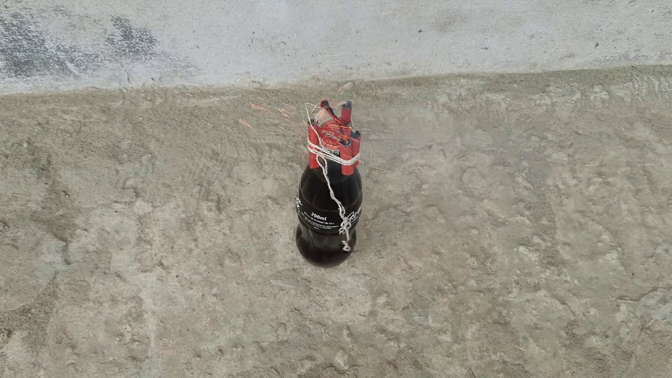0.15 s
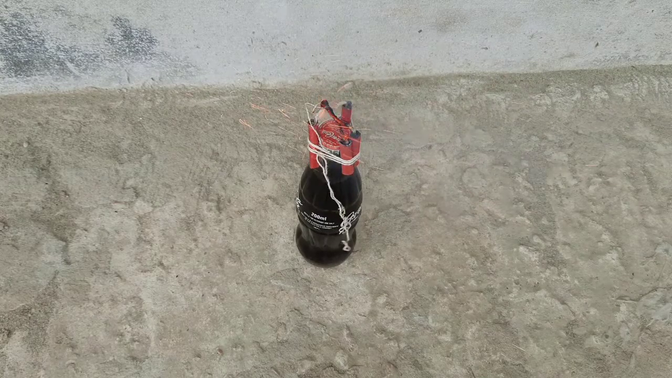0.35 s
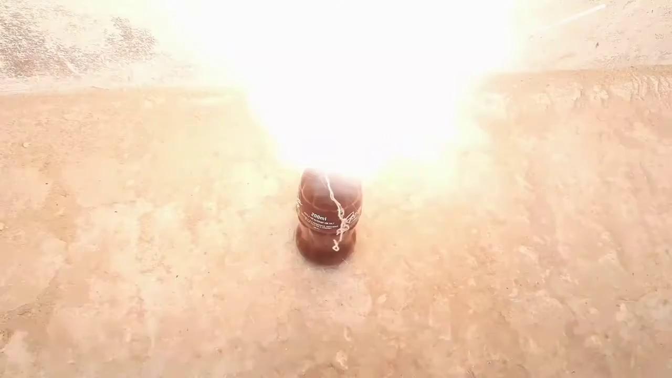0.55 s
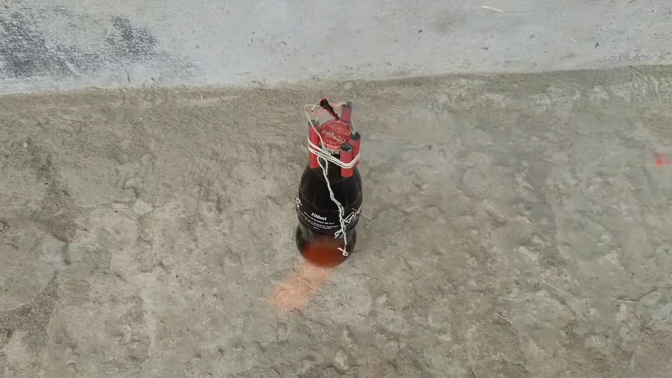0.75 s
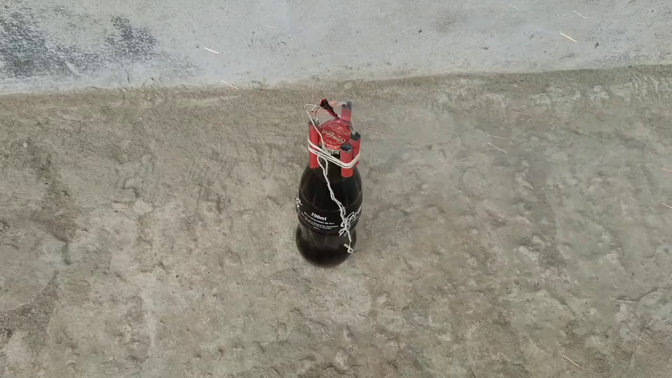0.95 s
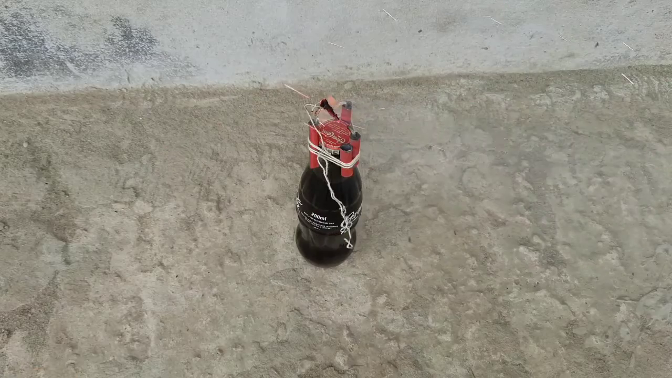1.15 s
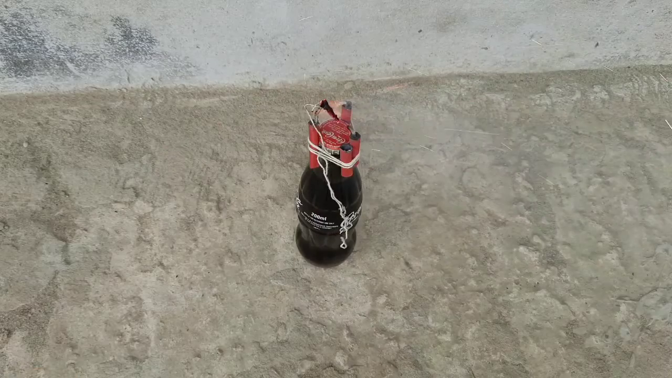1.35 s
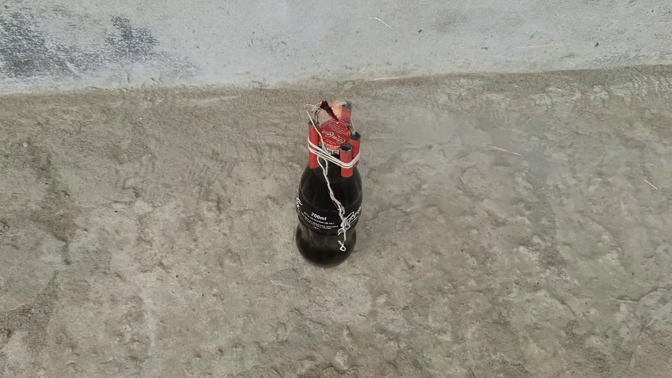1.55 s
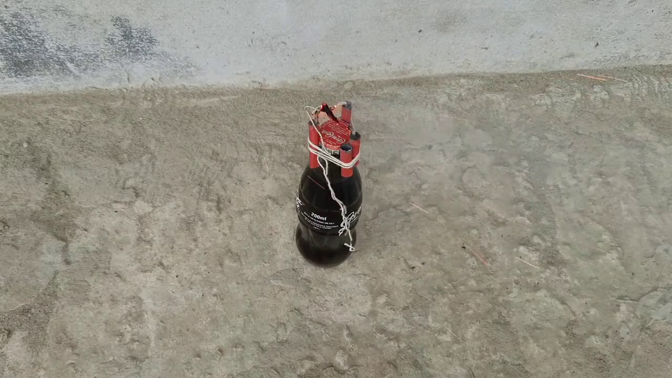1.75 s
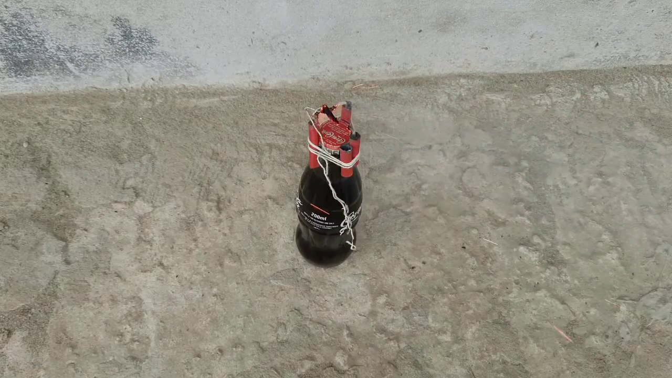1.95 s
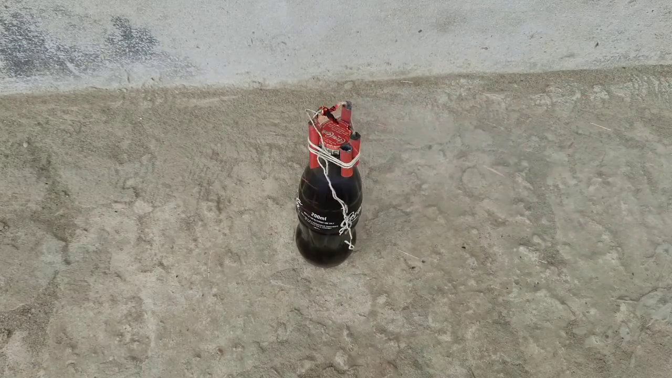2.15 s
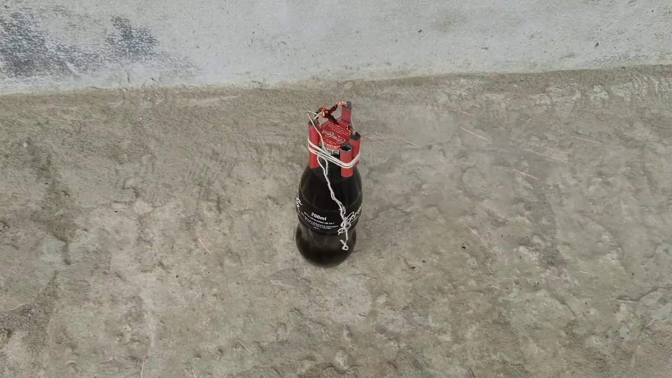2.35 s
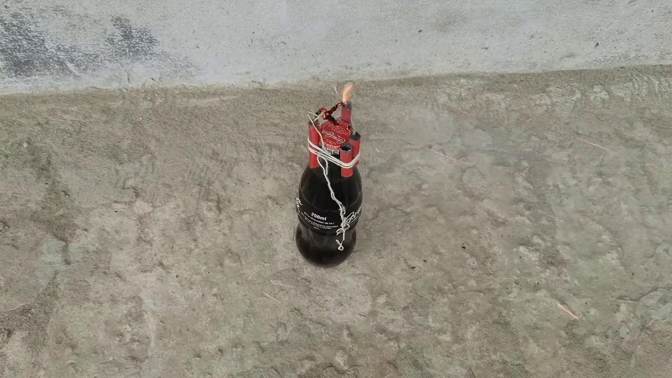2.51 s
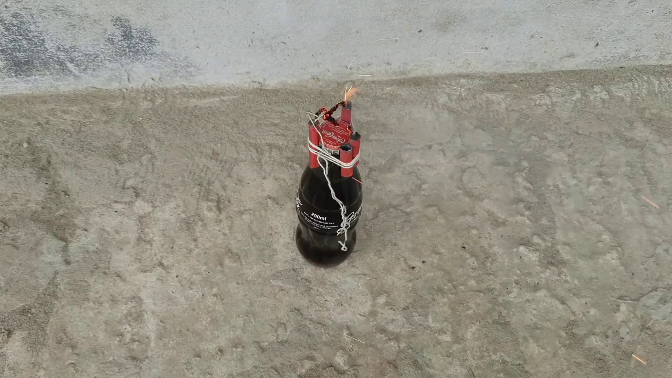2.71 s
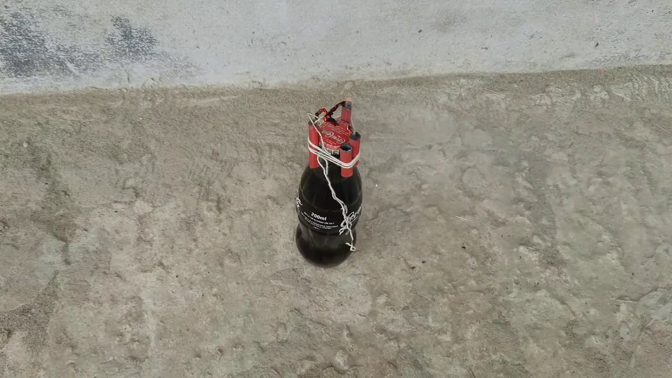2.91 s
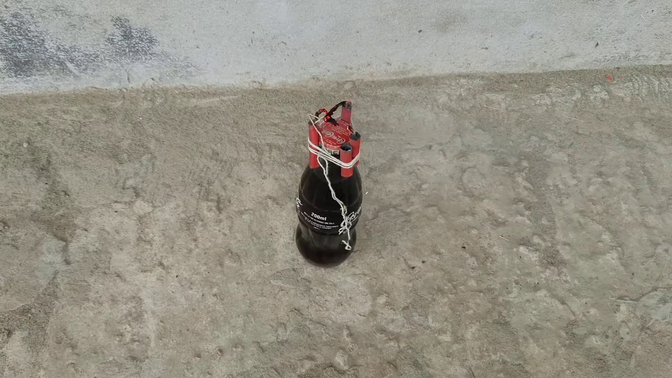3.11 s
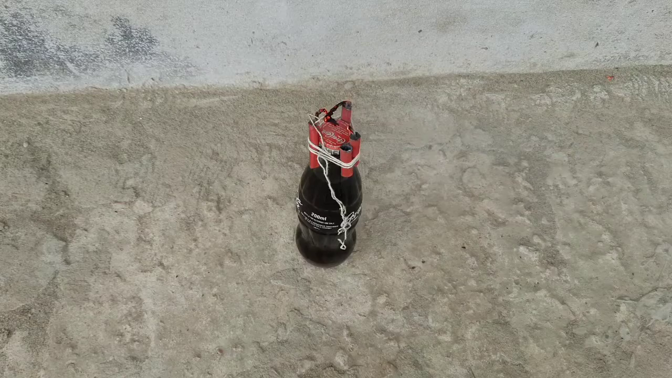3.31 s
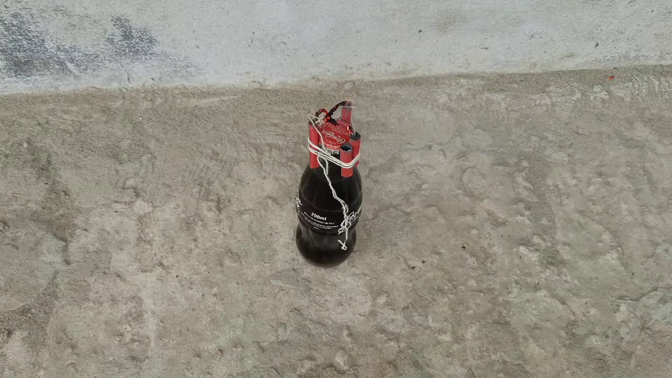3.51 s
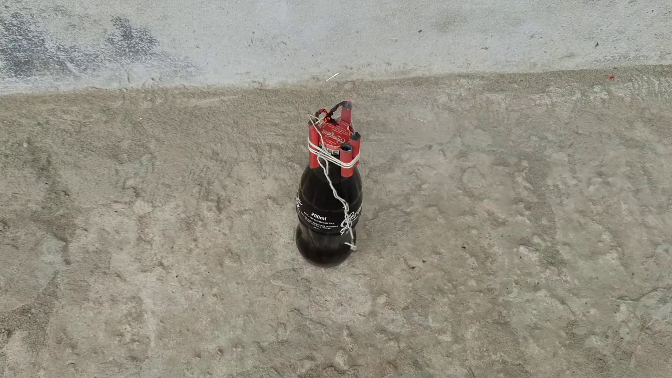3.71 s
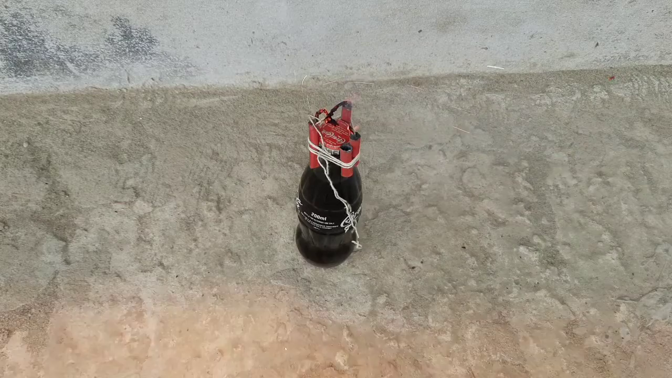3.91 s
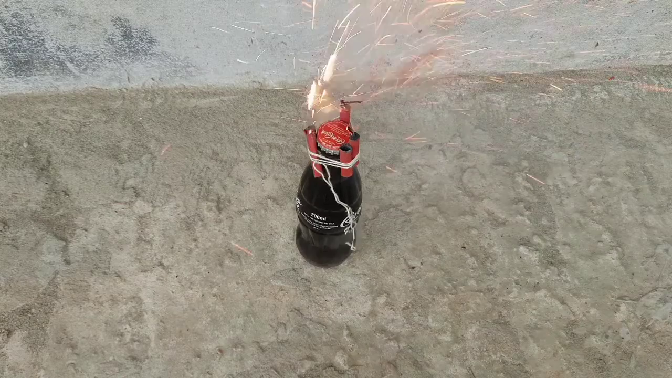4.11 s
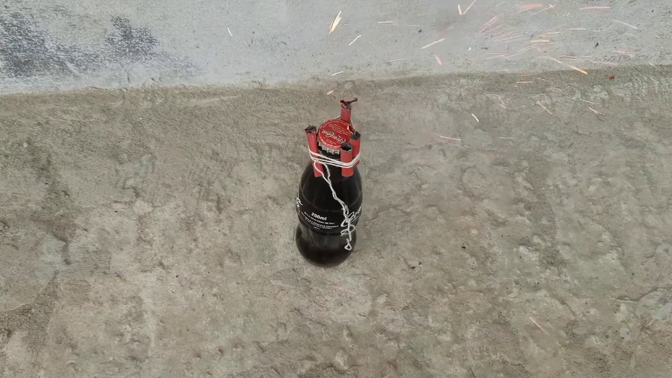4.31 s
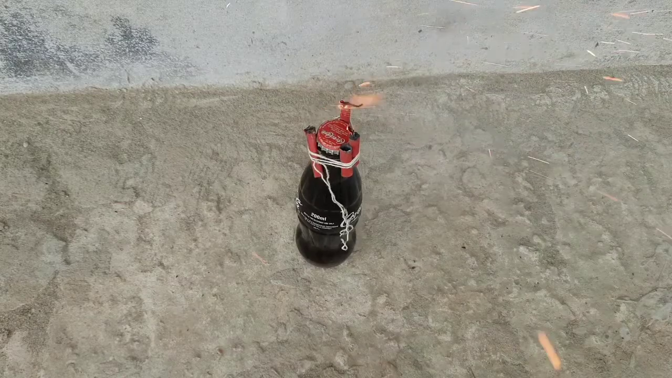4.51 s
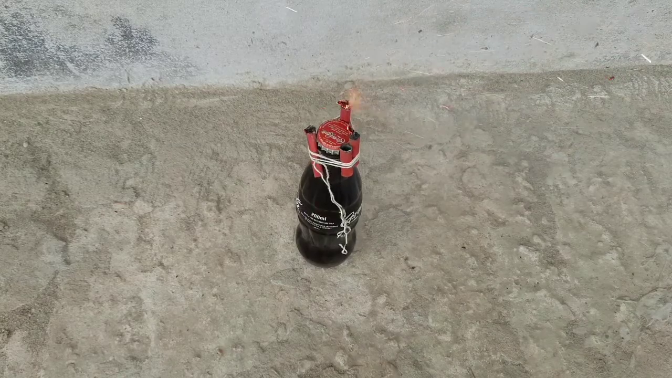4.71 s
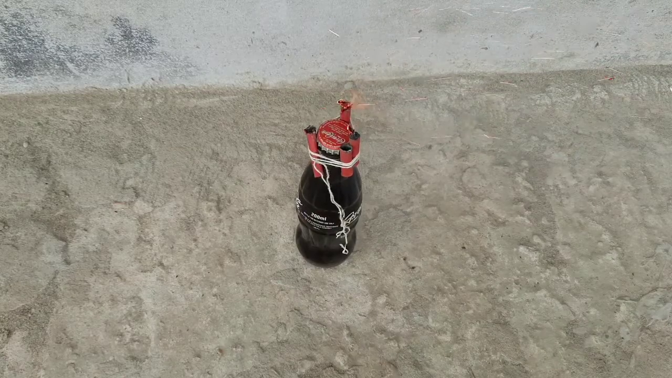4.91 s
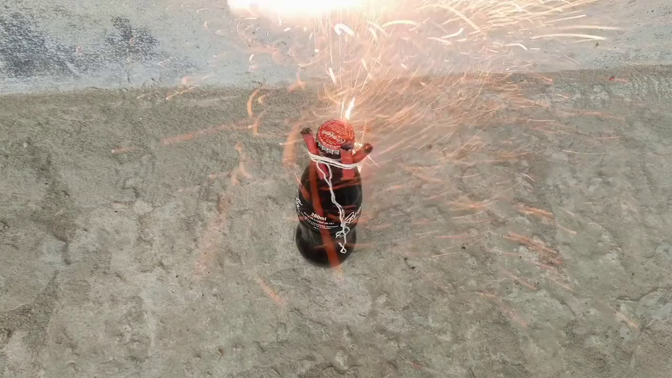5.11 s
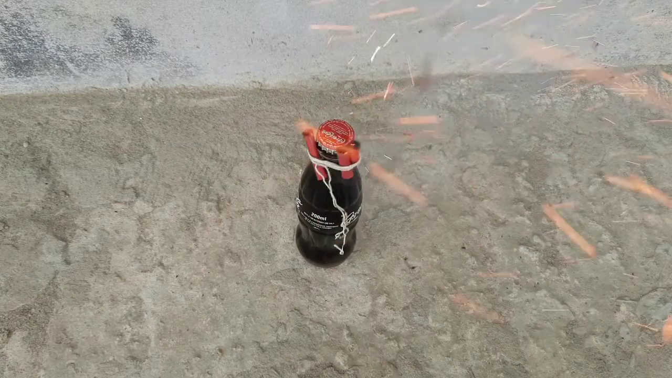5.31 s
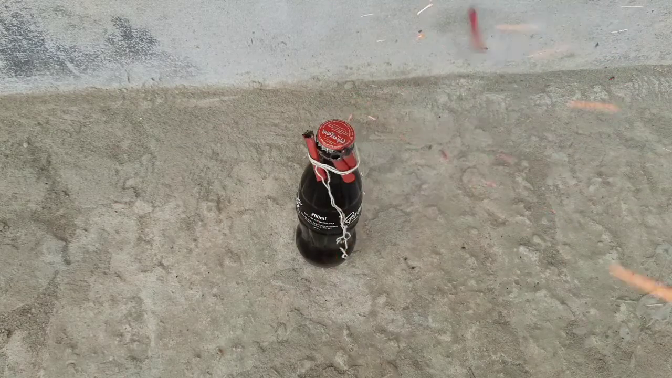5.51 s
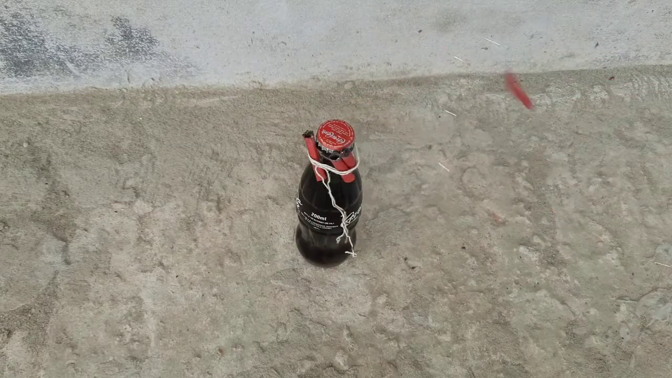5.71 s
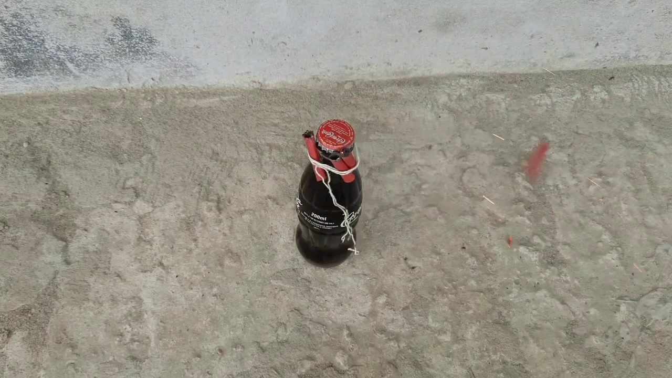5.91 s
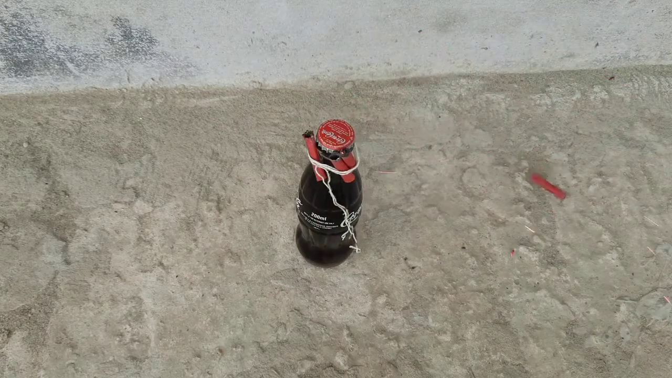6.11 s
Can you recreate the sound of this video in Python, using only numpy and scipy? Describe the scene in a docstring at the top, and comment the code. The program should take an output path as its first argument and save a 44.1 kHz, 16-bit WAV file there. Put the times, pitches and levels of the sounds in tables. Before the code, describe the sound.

In a concrete yard surrounded by walls, quiet outdoor murmur and thin hiss sit beneath a faint fuse fizz that brightens until 0.4 s. A firecracker then explodes: a steep, clipped shock, a very short tearing crack and a deep push of air. Low thumps, hollow knocks and bright slaps return at once, with a flutter about eight times a second that dulls and fades within a second. Scraps crackle and skitter around 0.8 s. Rumble decays slowly and patchily while fuse fizz swells broadly near 1.6 s, flares briefly at 2.3 s and weakly at 3.7 s. At 4.2 s a second, brighter-cracking blast hits, echoing again; a duller fizz peaks near 4.9 s. The third blast at 5.26 s is longer, more tearing, with stronger, harder echoes. A dry scrap snaps at 5.85 s as rumble continues to the end. The close phone microphone overloads and buzzes slightly.

```python
"""A fuse fizzes, then three firecrackers tied to a bottle go off on a concrete yard, close to a phone.
Each blast is a steep pressure shock, a tearing noise crack and a slow heave of air; the microphone overloads.
Walls answer with low thumps, hollow knocks and bright slaps, and a flutter bounces between two house fronts.
Slowly fading noise makes the neighbourhood's rumble, while short bursts of crackle are scraps of casing.
Further flares of fizzing noise come between the blasts, over a quiet murmur and hiss of outdoor air."""
import sys
import numpy as np
from scipy import signal
from scipy.fft import rfft, irfft, next_fast_len
from scipy.io import wavfile
from scipy.ndimage import uniform_filter1d

SR = 44100
rng = np.random.default_rng(int(sys.argv[2]) if len(sys.argv) > 2 else 0)


def output_pcm(signal):
    """Save a mono or channel-first signal as 16-bit PCM at the path in sys.argv[1].

    Samples are clipped to [-1, 1] before scaling.
    """
    pcm = np.clip(np.atleast_2d(signal).T, -1, 1) * 32767
    wavfile.write(sys.argv[1], SR, np.round(pcm).astype(np.int16))


N = 275837
T = np.arange(N) / SR  # seconds
SIZE = next_fast_len(N + 4096)
HZ = np.arange(SIZE // 2 + 1) * SR / SIZE + 1e-3  # just above zero, so that its logarithm exists

# Quiet outdoor air. Each row: frequency in Hz, noise density in dB per Hz before its level wanders.
YARD_SPECTRUM = [(15, -78), (35, -74.5), (110, -76), (200, -88), (700, -93), (1400, -96.5), (2500, -101),
                 (3900, -100), (5200, -107), (8000, -106), (10500, -113), (15500, -116)]
# Fizz of a fuse. Each row: frequency in Hz, noise density in dB per Hz before the burn sets its level.
FUSE_SPECTRUM = [(30, -60.5), (180, -68.5), (305, -64.5), (450, -68), (680, -68), (840, -75), (1000, -70.5),
                 (1350, -76), (2700, -71.5), (4100, -68.5), (5600, -88.5), (8000, -71.5), (10500, -88.5),
                 (15300, -88)]
# Burn of the first fuse, in the open. Each row: time in seconds, burn in dB, counted from the strongest row.
FIRST_FUSE = [(0.0, -47), (0.118, -48), (0.14, -44), (0.384, -34), (0.396, -44)]
# Later flares of the fuses. Each row: peak time in seconds, level in dB, treble in dB relative to that level,
# rise and fall time constants in seconds.
FLARES = [(.86, -16, -7, 0.089, 0.17), (1.6, -15.5, -15.5, 0.93, 0.84), (2.26, -5, -11, 0.077, 0.12),
          (3.7, -22, -6, 0.3, 0.57), (4.92, -4, -23.5, .09, 0.32)]
# The firecrackers. Each row: start in seconds, shock level in dB, crack level in dB, crack length in seconds,
# crack treble in dB, heave level in dB, heave frequency in Hz, echo level in dB, knock brightness in dB.
FIRECRACKERS = [(0.4127, 3, 2.5, 0.0039, -4.5, -2.5, 37, -8, 2.5),
                (4.2059, 0.5, 1.5, 0.0084, 3.5, 1, 45.4, -8, -7.5),
                (5.26, -2.5, 5, 0.02, -1.5, -8, 27.4, 0.5, 9.5)]
# Tearing crack. Each row: frequency in Hz, noise density in dB per Hz before the level of each blast.
CRACK_SPECTRUM = [(40, -36.5), (200, -40), (550, -41.5), (850, -44.5), (1250, -50.5), (2100, -53),
                  (3800, -58.5), (5000, -64.5), (8000, -63.5), (10500, -66.5), (15500, -76.5)]
# Large faces that return the bass. Each row: delay in seconds (the thump peaks a little later),
# level in dB before the blast's bass level, frequency in Hz, lateness of the left ear in ms.
BOOMS = [(0.0426, -5, 35, -1.5), (0.0969, -0.5, 63, 3), (0.118, -16, 55.8, -1.8), (0.157, -13, 130, 1.6),
         (0.212, 1, 82.7, 0.1), (1.21, -24.5, 150, -.5)]
# Single walls that slap back. Each row: delay in seconds, knock level in dB and slap level in dB,
# both before the blast's echo level, and smear in seconds.
WALLS = [(0.0427, 12, 12, 0.0028), (0.0842, 8, 1, 0.01), (0.131, 3, -2.5, 0.017), (0.156, 1.5, 5.5, 0.012),
         (.59, -7.5, -11.5, .012), (1.203, -16.5, -29, 0.015)]
# Hollow knock of an echo. Each row: frequency in Hz, noise density in dB per Hz before the echo levels.
KNOCK_SPECTRUM = [(60, -54), (200, -46.5), (310, -44.5), (400, -58), (520, -52), (720, -68.5), (1050, -78),
                  (2000, -99.5), (5000, -130)]
# Bright slap of an echo. Each row: frequency in Hz, noise density in dB per Hz before the echo levels.
SLAP_SPECTRUM = [(300, -80), (900, -75.5), (1400, -65.5), (2200, -76), (3300, -77), (4800, -86.5),
                 (8000, -84.5), (11500, -83), (15500, -94)]
# Rumbling tail. Each row: frequency in Hz, noise density in dB per Hz before the tail levels.
TAIL_SPECTRUM = [(15, -45), (40, -37), (70, -35), (125, -34.5), (210, -46.5), (310, -58), (600, -64),
                 (1050, -69.5), (2200, -72), (4500, -86.5), (8500, -84.5), (12500, -92.5)]
# Scraps of casing that crack against the wall and skitter on. Each row: start in seconds, level in dB,
# length in seconds at full level.
SCRAPS = [(0.775, -3, 0.012), (0.822, -10.5, .11), (5.845, 3.5, 0.0058)]
# Crackle of the scraps. Each row: frequency in Hz, noise density in dB per Hz before the level of each scrap.
SCRAP_SPECTRUM = [(500, -90), (1500, -84), (2600, -78), (3200, -73.5), (4200, -93.5), (8000, -86),
                  (15000, -96)]
# Reflections from the hand, ground and nearest wall. Each row: delay in ms, gain as a plain factor.
NEAR_REFLECTIONS = [(.97, 0.062), (2.96, 0.11), (4.06, .15), (6.2, 0.054), (8.9, 0.13), (14.4, 0.09)]
# A loose part in the phone that buzzes with the bass. Each row: frequency in Hz, noise density in dB per Hz
# before the bass sets its level.
BUZZ_SPECTRUM = [(10000, -104), (11500, -84), (12000, -68.5), (12450, -86.5), (14000, -104)]
# Resonances and hollows of the phone's housing. Each row: centre in Hz, width in Hz, gain in dB.
HOUSING = [(695, 19, 1.5), (770, 45, 0.5), (906, 40, 1.5), (1137, 49, 0), (1880, 55, -3), (2140, 33, 6),
           (2466, 85, -3), (3940, 41, -8.5)]
# Microphone colour. Each row: frequency in Hz, gain in dB.
MIC_COLOUR = [(20, -3), (4750, -2), (5250, -10.5), (6800, -12), (7250, -4), (16000, 1.5)]

PORT_LAG_MS = 0.2484
TOP_HZ = 15800
FIRST_FUSE_PEAK_DB, FIRST_FUSE_TREBLE_DB = 4, 2.5
BODY_FOLLOWS, TREBLE_FOLLOWS = 0.58, 0.85  # dB gained for each dB of burn
CRACK_RISE_S, ECHO_RISE_S = 0.0025, 0.0004  # echoes rise more slowly with delay
HEAVE_AFTER_S = 0.006  # counted from the end of the crack length
BASS_DB, BASS_FOLLOWS = -1.5, 0.75  # the booms differ less between blasts than the slaps do
# Flutter between two house fronts: one strong and one weak pass on every round trip.
FLUTTER_FIRST_S, ROUND_TRIP_S, WEAK_PASS_AFTER_S = 0.122, 0.1185, 0.07
FLUTTER_DB, WEAK_PASS_DB = 1.5, -8  # the weak pass is relative to the strong one
# It sags throughout, and the fast fade adds to that after the hold.
FLUTTER_HOLD_S, FLUTTER_SAG_DB_PER_S, FLUTTER_FADE_DB_PER_S = 0.65, 9, 61.5
FLUTTER_SMEAR_S, SMEAR_GROWTH = 0.0091, 0.019  # growth in seconds per second of delay
FLUTTER_THUMP_DB, FLUTTER_THUMP_HZ = -15.5, 108  # dB relative to the knock, Hz before a random detune
SLAP_DB, SLAP_LOSS_DB_PER_S = 6.5, 20.5  # relative to the knock; air dulls an echo as it travels
SLAP_FOLLOWS_TREBLE = 1  # dB of slap for each dB of crack treble
TAIL_DB = 6  # over the echo level of each blast
TAIL_T60_DEEP_S, TAIL_T60_MIDDLE_S, TAIL_T60_HIGH_S = 2.54, 2.75, 2


def undb(db):
    """Turn dB into an amplitude factor."""
    return 10 ** (np.asarray(db) / 20)


def colour(points):
    """Gain at each frequency, drawn through (Hz, dB) points on a logarithmic frequency axis."""
    hz, db = np.transpose(points)
    return undb(np.interp(np.log(HZ), np.log(hz), db))


def shape(x, gain):
    """Filter a sound by a gain for each frequency."""
    return irfft(rfft(x, SIZE) * gain, SIZE)[..., :N]


def above(hz):
    """Smooth high-pass gain that reaches one half at hz."""
    return HZ ** 4 / (HZ ** 4 + hz ** 4)


def hiss(points, lag_ms, likeness):
    """Shaped noise at two ports: a shared part, late on the right, and a part of their own."""
    shared, left, right = rfft(rng.standard_normal((3, SIZE)))
    likeness = np.clip(likeness, 0, 1)
    lag = np.exp(-2j * np.pi * HZ * lag_ms / 1000)
    common = np.array([shared, shared * lag])
    both = np.sqrt(likeness) * common + np.sqrt(1 - likeness) * np.array([left, right])
    return irfft(both * colour(points) * np.sqrt(SR / 2), SIZE)[:, :N]


def walk(rate):
    """Random levels, rate a second, joined by straight lines."""
    return np.interp(T * rate, np.arange(4096), rng.standard_normal(4096))


def burst(t, length, rise, fall):
    """Envelope that swells exponentially up to time zero, holds for length and dies away."""
    before = np.minimum(t, 0)
    after = np.maximum(t - length, 0)
    return np.exp(np.maximum(before / rise - after / fall, -40))


def steady(x):
    """Even out the power of a noise from moment to moment, keeping its grain."""
    power = np.mean(x ** 2, axis=0)
    mean = power.mean()
    return x * np.sqrt(mean / (uniform_filter1d(power, size=330) + 0.27 * mean))


def swing(t, hz, cycles):
    """A push of air and the suction behind it, soon damped."""
    turn = np.clip(t * hz, 0, 20)
    return np.sin(2 * np.pi * turn) * np.exp(-(turn / cycles) ** 2)


def thud(t, hz, width):
    """A rounded push of air with a suction on either side."""
    turn = np.clip(t * hz, -10, 10)
    return np.cos(2 * np.pi * turn) * np.exp(-(turn / width) ** 2)


def yard():
    """Quiet outdoor air: a low murmur and a thin hiss that wander in level."""
    air = hiss(YARD_SPECTRUM, PORT_LAG_MS, likeness=0.85 - 0.5 * above(hz=290))
    return air * undb(0.5 * walk(1.1) + 1.67 * walk(36))


def fuses():
    """A sputtering jet of gas: the first fuse brightens as it burns harder; later flares swell and die down."""
    sputter = undb(1.03 * walk(45) + 1.7 * walk(600))
    jet = hiss(FUSE_SPECTRUM, 0.73 * PORT_LAG_MS, likeness=0.52) * sputter
    treble = shape(jet, above(hz=1780))
    s, db = np.transpose(FIRST_FUSE)
    burn = np.interp(T, s, db - db.max())
    lit = burst(T, s[-1], rise=0.04, fall=0.015)
    first = lit * undb(FIRST_FUSE_PEAK_DB + BODY_FOLLOWS * burn)
    body_power = first ** 2
    # the treble's own following adds to that of the body
    treble_power = (first * undb(FIRST_FUSE_TREBLE_DB + TREBLE_FOLLOWS * burn)) ** 2
    for peak, flare_db, treble_db, rise, fall in FLARES:
        flare = undb(flare_db) * burst(T - peak, 0, rise, fall)
        body_power += flare ** 2
        treble_power += (flare * undb(treble_db)) ** 2
    return np.sqrt(body_power) * (jet - treble) + np.sqrt(treble_power) * treble


def blasts():
    """Direct sound: a steep shock with its suction, the tearing crack, then the heave of the gas cloud."""
    crack = steady(hiss(CRACK_SPECTRUM, PORT_LAG_MS, likeness=0.62))
    treble = shape(crack, above(hz=970))
    out = np.zeros((2, N))
    for s, shock_db, crack_db, length, treble_db, heave_db, heave_hz, *_ in FIRECRACKERS:
        t = T - s
        shock = 1.02 * swing(t, hz=475, cycles=0.37) - swing(t - 0.001, hz=121.4, cycles=1.0)
        heave = swing(t - length - HEAVE_AFTER_S, heave_hz, cycles=0.63)
        tearing = burst(t, length, rise=CRACK_RISE_S, fall=0.0077 + 0.17 * length)
        out += undb(shock_db) * shock
        out += undb(heave_db) * heave
        out += undb(crack_db) * tearing * (crack + (undb(treble_db) - 1) * treble)
    return out


def echoes():
    """Walls return the blast as low thumps, hollow knocks and bright slaps smeared by their rough faces."""
    span = 2 * SR
    t = np.arange(span) / SR
    thump, knock, slap = np.zeros((2, span)), np.zeros(span), np.zeros(span)
    passes = flutter(count=8)
    soft_booms = []
    for delay, db, *_ in passes:
        pitch, side = rng.standard_normal(2)
        hz = FLUTTER_THUMP_HZ * np.exp(0.15 * pitch)
        soft_booms.append((delay, db + FLUTTER_THUMP_DB, hz, 0.77 * side))
    for delay, db, hz, lag_ms in BOOMS + soft_booms:
        ports = t - delay - np.array([[lag_ms], [0]]) / 1000
        thump += undb(db) * thud(ports - 0.006, hz, width=0.75)  # the bass comes late
    for delay, knock_db, slap_db, smear in WALLS + passes:
        # the further an echo has come, the softer its edges
        arrival = burst(t - delay, smear, rise=ECHO_RISE_S + 0.0056 * delay, fall=0.0067 + 0.013 * delay)
        knock += undb(knock_db) * arrival
        slap += undb(slap_db) * arrival
    hollow = steady(hiss(KNOCK_SPECTRUM, 0.47, likeness=0.33))
    hard = shape(hollow, above(hz=378))
    spray = undb(2 * walk(900)) * hiss(SLAP_SPECTRUM, 0, likeness=0.031)
    out = np.zeros((2, N))
    for s, _, _, length, treble_db, _, _, echo_db, bright_db in FIRECRACKERS:
        start = int((s + 0.19 * length) * SR)  # a longer blast has its weight later
        count = min(span, N - start)
        now = slice(start, start + count)
        body = hollow[:, now] + (undb(bright_db) - 1) * hard[:, now]
        edge = undb(SLAP_FOLLOWS_TREBLE * treble_db) * spray[:, now]
        out[:, now] += undb(BASS_DB + BASS_FOLLOWS * echo_db) * thump[:, :count]
        out[:, now] += undb(echo_db) * (knock[:count] * body + slap[:count] * edge)
    return out


def flutter(count):
    """Passes between two house fronts, duller and more smeared with delay, each train ever weaker."""
    passes = []  # delay s, knock dB, slap dB, smear s
    for trip in range(count):
        for after, db in [(0, FLUTTER_DB), (WEAK_PASS_AFTER_S, FLUTTER_DB + WEAK_PASS_DB)]:
            delay = FLUTTER_FIRST_S + trip * ROUND_TRIP_S + after
            sag = FLUTTER_SAG_DB_PER_S * delay
            fade = FLUTTER_FADE_DB_PER_S * max(delay - FLUTTER_HOLD_S, 0)
            knock_db = db - sag - fade
            slap_db = knock_db + SLAP_DB - SLAP_LOSS_DB_PER_S * delay
            passes.append((delay, knock_db, slap_db, FLUTTER_SMEAR_S + SMEAR_GROWTH * delay))
    return passes


def rumble():
    """Countless far reflections, as noise that builds up after each blast and rolls away in patches."""
    air = hiss(TAIL_SPECTRUM, 0, likeness=1.12 * (1 - above(hz=109.0)))
    high = shape(air, above(hz=700))
    deep = shape(air - high, 1 - above(hz=164))
    middle = air - high - deep
    out = np.zeros((2, N))
    for band, t60, patches_db in [(deep, TAIL_T60_DEEP_S, 2 * walk(30)),
                                  (middle, TAIL_T60_MIDDLE_S, 3.2 * walk(45)),
                                  (high, TAIL_T60_HIGH_S, 3.6 * walk(35) + 2.5 * walk(400))]:
        power = np.zeros(N)
        for s, *_, echo_db, _ in FIRECRACKERS:
            age = np.maximum(T - s, 0)
            arrived = 1 - np.exp(-(age / 0.089) ** 3)
            power += (arrived * undb(TAIL_DB + echo_db - 60 * age / t60)) ** 2
        out += undb(patches_db) * np.sqrt(power) * band
    return out


def scraps():
    """Stiff paper scraps strike and scrape with a dry, grainy crackle."""
    crackle = hiss(SCRAP_SPECTRUM, 0, likeness=0.35) * undb(2.8 * walk(500))
    level = np.zeros(N)
    for s, db, length in SCRAPS:
        level += undb(db) * burst(T - s, length, rise=0.0004, fall=0.0023 + 0.22 * length)
    return crackle * level


def scene():
    """All sources, coloured by delayed copies from the surfaces close to the phone."""
    nearby = 1 + sum(gain * np.exp(-2j * np.pi * HZ * ms / 1000) for ms, gain in NEAR_REFLECTIONS)
    return shape(yard() + fuses() + blasts() + echoes() + rumble() + scraps(), nearby)


def record(dry):
    """The overloaded microphone rounds the peaks; its housing buzzes, colours the sound and dips the treble."""
    ceiling = 1.54
    bass = np.abs(shape(dry.mean(axis=0), 1 - above(hz=300)))
    shaken = np.abs(uniform_filter1d(bass, size=300))
    rattle = shaken / (shaken + 0.12) ** 0.5  # the part has little room to move
    buzz = rattle * hiss(BUZZ_SPECTRUM, 0, likeness=0.42)
    pressure = ceiling * np.tanh(dry / ceiling) + buzz
    housing = undb(sum(db * np.exp(-((HZ - hz) / width) ** 2) for hz, width, db in HOUSING))
    balance = undb(np.array([[-0.35], [0.35]]))  # the right is slightly louder
    heard = shape(pressure, colour(MIC_COLOUR) * housing) * balance
    low_pass = signal.ellip(10, 0.2, 80, TOP_HZ, fs=SR, output="sos")
    return signal.sosfilt(low_pass, heard)


dry = scene()
out = record(dry)
output_pcm(out)
```